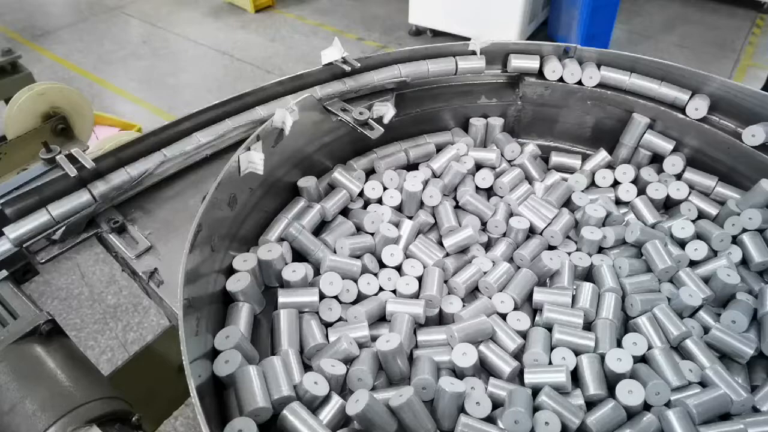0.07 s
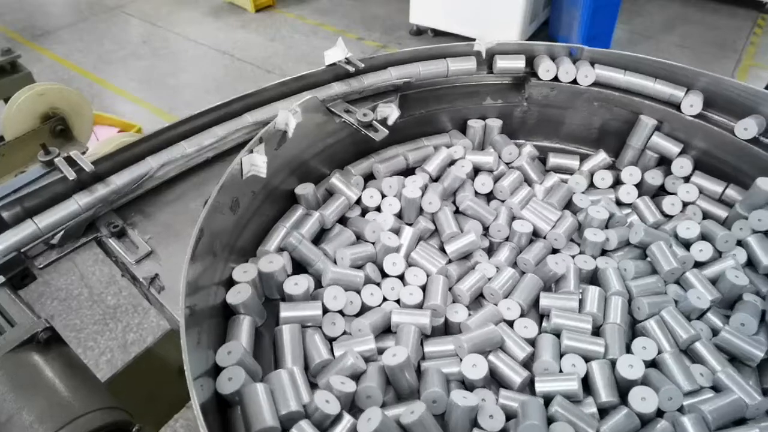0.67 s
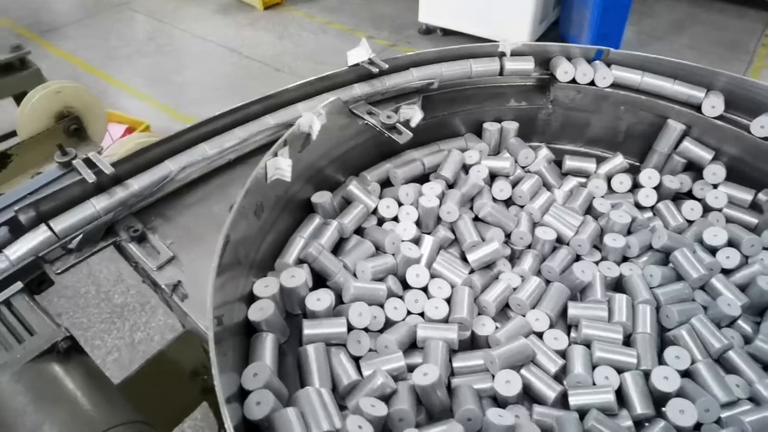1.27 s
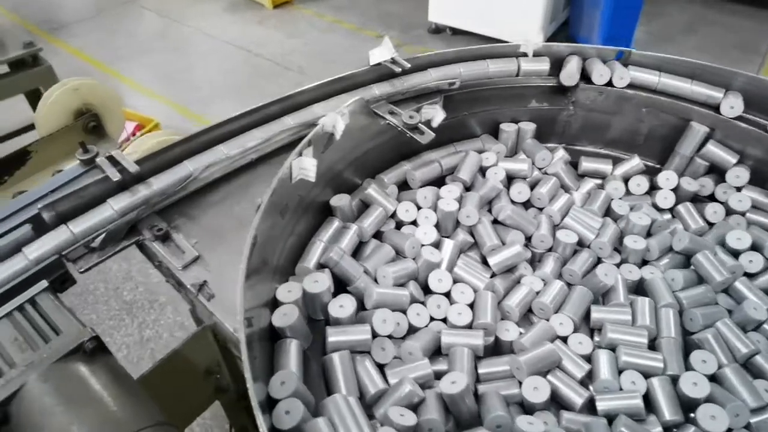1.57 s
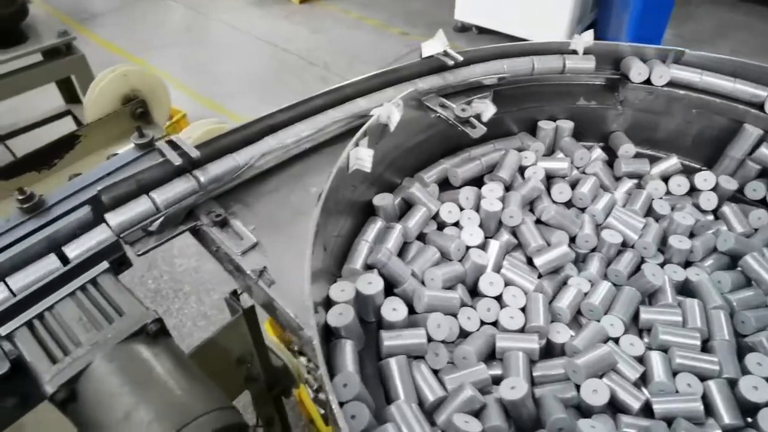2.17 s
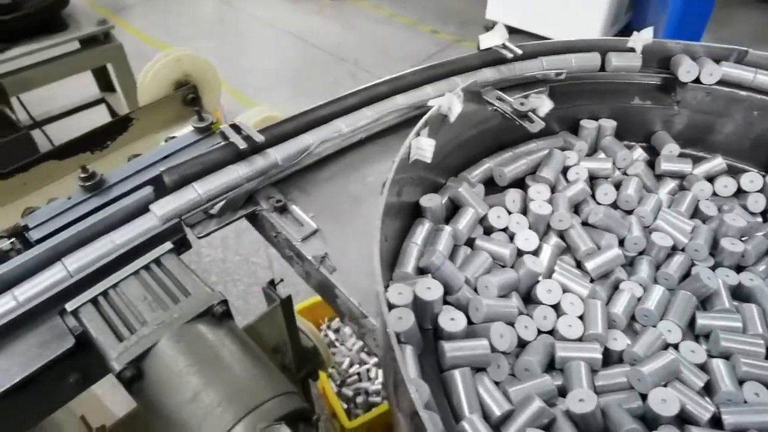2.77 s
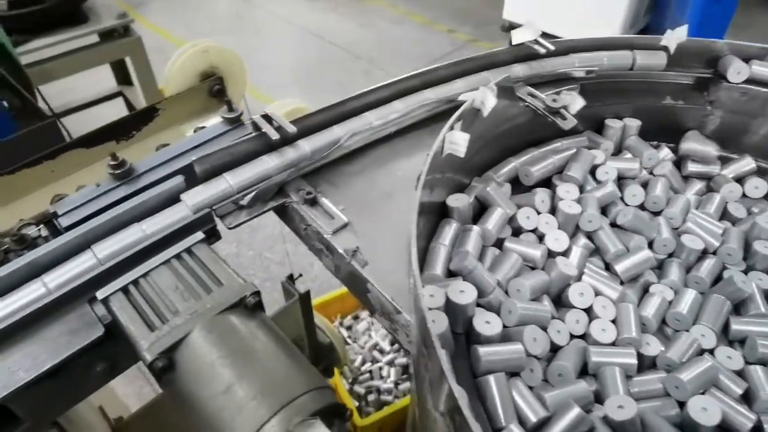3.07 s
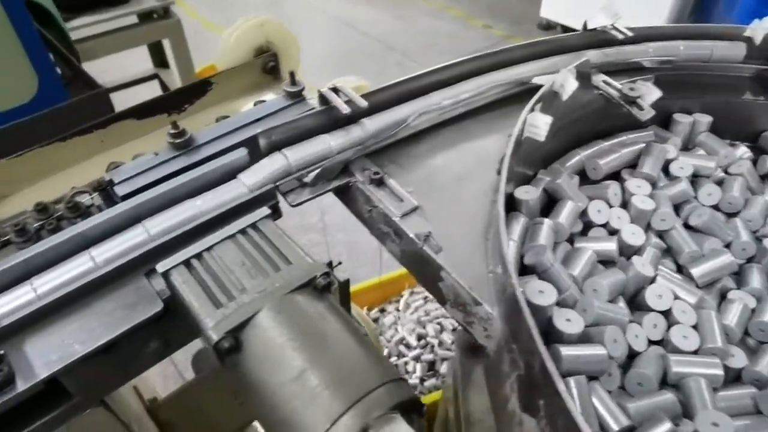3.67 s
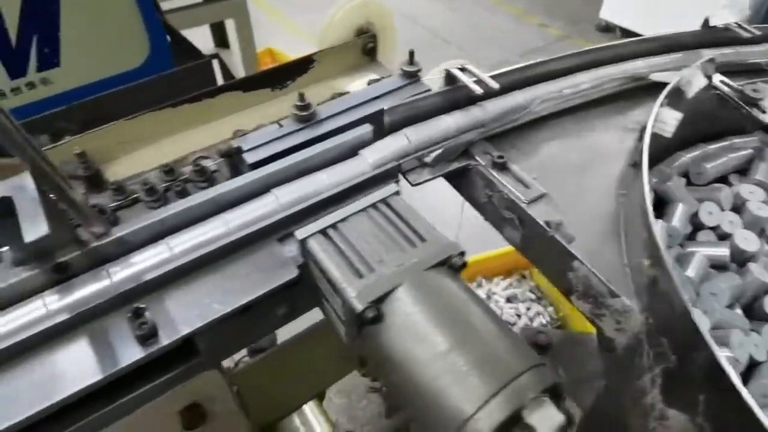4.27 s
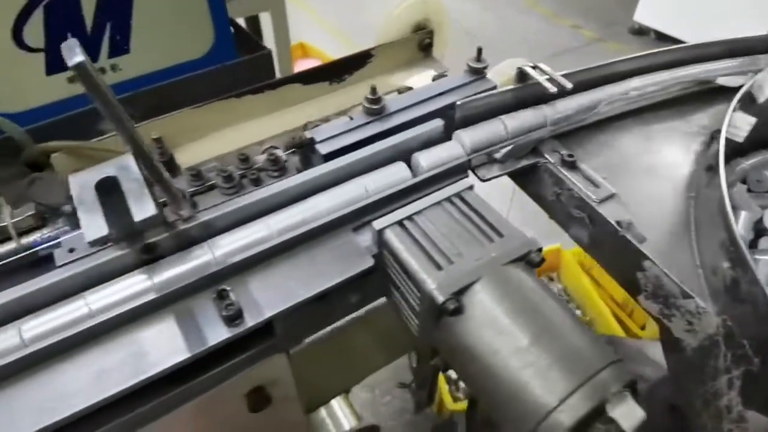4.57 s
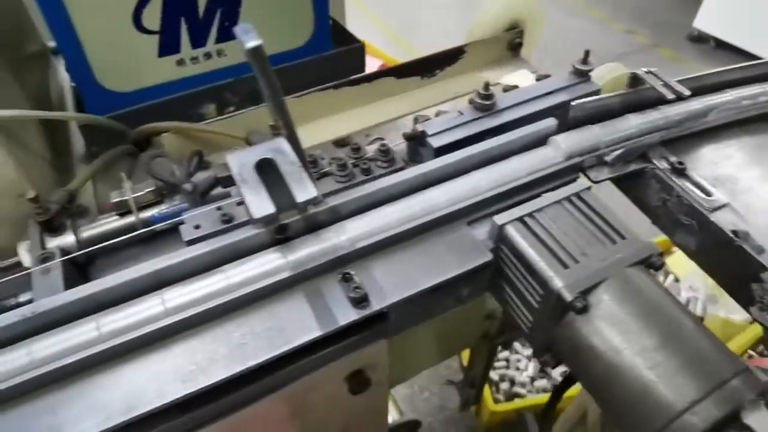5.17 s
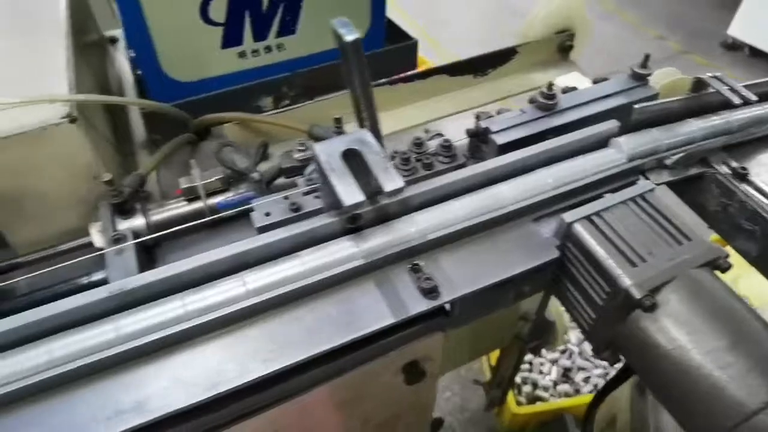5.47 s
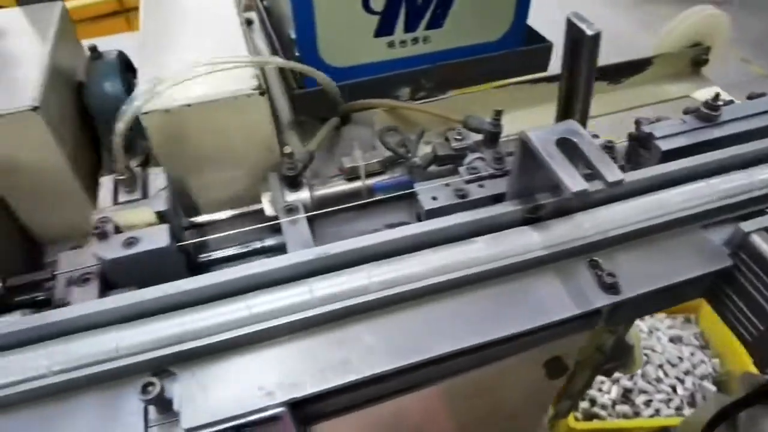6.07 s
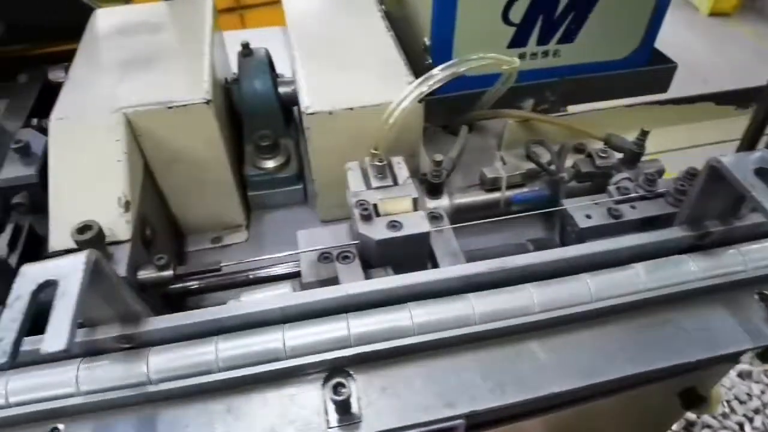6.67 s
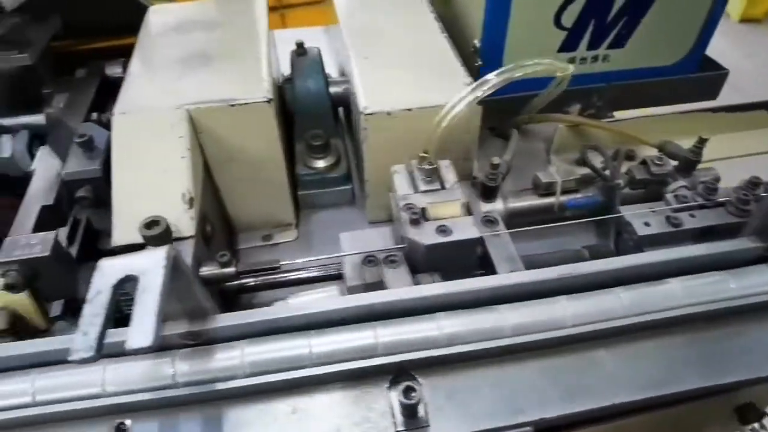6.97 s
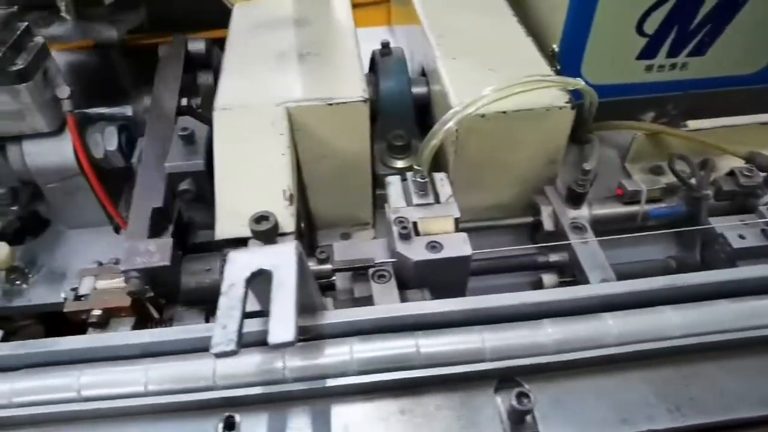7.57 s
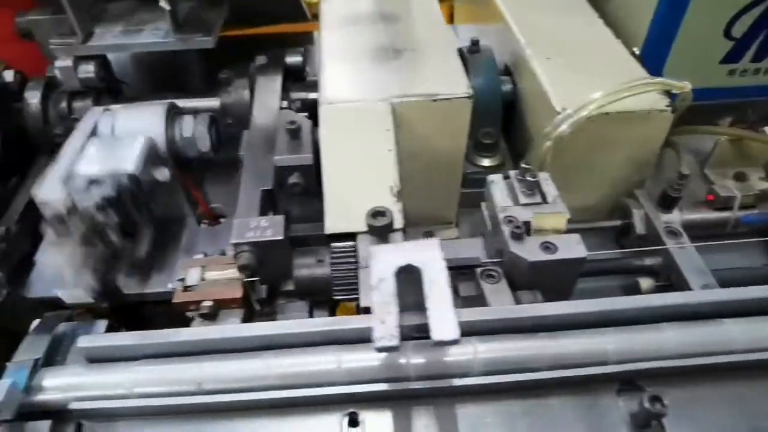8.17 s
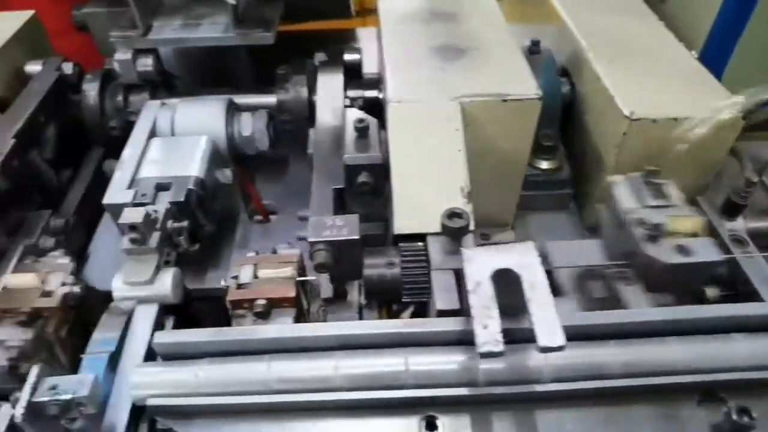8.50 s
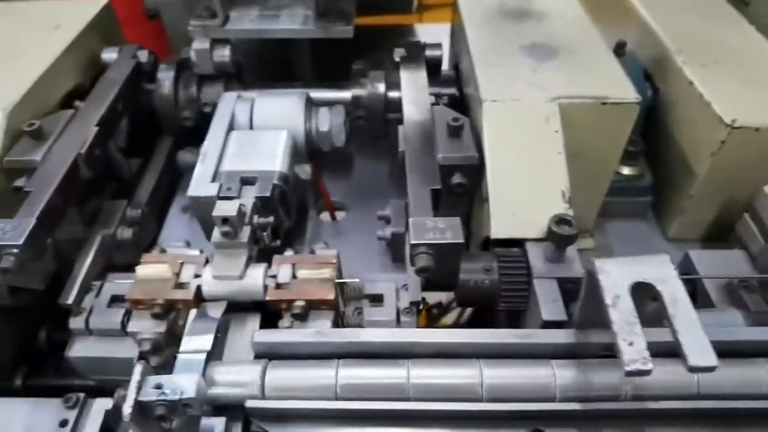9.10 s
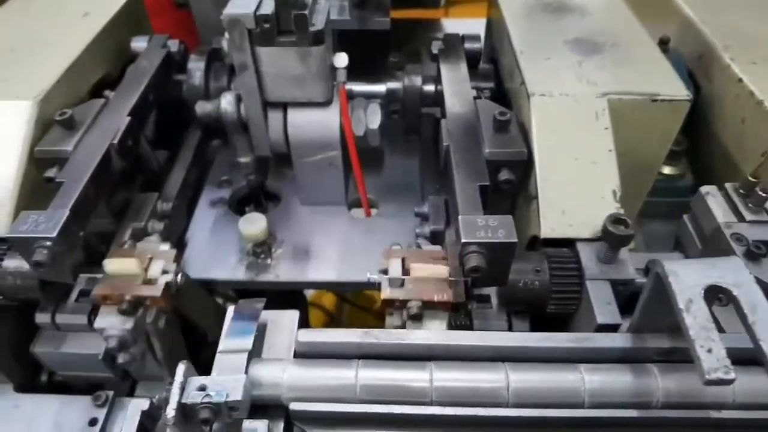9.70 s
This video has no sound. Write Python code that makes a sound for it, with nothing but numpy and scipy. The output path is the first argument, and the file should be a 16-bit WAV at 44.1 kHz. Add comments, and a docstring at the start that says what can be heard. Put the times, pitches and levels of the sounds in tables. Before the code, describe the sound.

In a factory hall, a vibrating bowl shakes small metal cylinders, making a continuous bright sizzle with scattered clinks over hum and rumble. An assembly machine repeats a round of sharp clacks, snaps and knocks about every two seconds. The microphone moves from the bowl along a rail, where chattering parts swell midway, then reaches the machine, where thuds grow heavier and a few tiny squeaks slip through.

```python
"""A factory hall, where a vibrating bowl feeder shakes small metal cylinders into an assembly machine.
The parts sizzle and clink in the bowl and chatter along the rail, over a bed of magnet hum and frame
rumble. About every 2.3 s the camshaft plays its round of clacks, snaps, knocks and thuds and the press
lands; now and then a dry slide squeaks. The microphone travels from the bowl along the rail to the
machine."""
import sys
import numpy as np
from scipy import signal
from scipy.fft import rfft, irfft, next_fast_len
from scipy.io import wavfile
from scipy.ndimage import uniform_filter1d, map_coordinates

SR = 44100
rng = np.random.default_rng(int(sys.argv[2]) if len(sys.argv) > 2 else 0)


def generate_wav(sig):
    """Save sig (samples, or channels by samples) to the path in sys.argv[1] as 16-bit PCM at SR."""
    pcm = np.round(np.clip(np.atleast_2d(sig).T, -1, 1) * 32767).astype(np.int16)
    wavfile.write(sys.argv[1], SR, pcm)


N = 433944
MAINS_HZ = 50

# stereo image of the hall: (frequency [Hz], left-right likeness [-1..1])
HALL_LIKENESS = [(100, 0.91), (350, 0.95), (700, 0.69), (1100, 0.39), (1500, -0.35), (2000, -0.28),
                 (2600, 0.36), (3600, -0.16), (4500, -0.053), (5700, -0.025), (7800, 0.47), (10000, 0.13),
                 (15000, 0.29)]
# colour of the microphone ports: (frequency [Hz], left minus right [dB])
PORT_COLOUR = [(300, 0), (800, 1.5), (2500, 0.3), (4400, -0.5), (5200, -2.5), (6000, -1), (7000, -1.7),
               (8400, 0.2), (9300, 2.5), (13000, 1)]
# brief dips of the whole mix: (middle [s], length [s], change [dB])
MIX_DIPS = [(1.35, 0.066, -3.5), (3.688, 0.07, -3)]

# fader rides: (time [s], level [dB])
MASTER_FADER = [(0.17, -68), (0.185, -34), (0.197, -3.5), (0.23, 2), (0.3, 7), (0.82, 7.5), (0.97, 2.5)]  # fades in, starts loud, settles
RUMBLE_FADER = [(0.3, -35.5), (1.2, -38), (3.2, -39.5), (4.2, -42), (4.7, -39.5), (5.2, -42.5),
                (6.6, -43.5), (7.4, -42), (7.9, -43.5), (9.1, -43), (9.84, -42.5)]  # cams and belts
RATTLE_FADER = [(0.45, -35), (0.85, -38.5), (1.0, -46), (1.8, -42), (2.9, -40), (3.3, -45), (4.4, -45.5),
                (4.7, -39), (5.0, -46), (5.25, -36), (5.55, -40.5), (6.1, -43.5), (7.4, -44.5),
                (8.0, -47.5), (9.2, -50.5), (9.84, -40)]  # sheet panels
HUM_FADER = [(0.3, -37), (1.2, -35.5), (2.59, -37.5), (2.62, -56), (5, -68), (9.84, -71)]  # the hum's fundamental, which drops away abruptly
BUZZ_FADER = [(0.3, -41), (1.0, -52), (2.6, -51), (3.8, -59), (5.1, -59), (5.4, -48), (8.0, -52),
              (9.84, -49.5)]  # the magnet's pull at twice the mains frequency
CHATTER_FADER = [(0.3, -34.5), (1.0, -38), (1.5, -36), (2.4, -36), (2.9, -35), (4.0, -39), (4.4, -40),
                 (4.57, -35.5), (4.65, -29.5), (4.77, -25.5), (4.86, -28), (4.96, -28.5), (5.0, -24.5),
                 (5.12, -23.5), (5.25, -28), (5.37, -27.5), (5.47, -25.5), (5.6, -29.5), (5.95, -34),
                 (7.1, -34.5), (7.4, -37.5), (7.9, -42.5), (8.8, -48), (9.4, -45), (9.55, -40.5),
                 (9.84, -37.5)]  # parts on track and rail
SIZZLE_FADER = [(0.3, -24.5), (1.2, -25.8), (1.75, -28), (2.65, -23), (3.35, -24), (3.8, -26.5), (4.0, -24),
                (4.3, -26), (4.7, -26.5), (5.1, -24.5), (5.25, -28), (6.2, -29.5), (6.85, -27.5),
                (7.1, -25), (7.35, -25.3), (7.75, -26.5), (8.2, -30), (9.2, -30), (9.84, -28)]  # parts in the bowl
HEAP_SIDE_FADER = [(2, 1.5), (4.4, 0), (6.5, -3.5)]  # the heap's side signal, which sets its width

# tone colours: (frequency [Hz], level [dB])
FRAME_EQ = [(25, -42), (70, -14), (105, -1), (160, 1.5), (220, -0.5), (320, -4.5), (430, -11.5),
            (800, -23.5), (2000, -65)]  # low rumble of the frame
PANEL_EQ = [(200, -20), (380, -3), (450, -4.5), (540, 1), (680, -1.5), (810, 0.5), (950, -3.5), (1400, -9),
            (3000, -23.5)]  # boxy sheet panels
CLICK_EQ = [(2500, -24), (5000, -2.5), (6700, 0), (8500, -0.5), (10500, -8), (16000, -32)]  # sharp edge of a steel hit
CLANK_EQ = [(400, -13), (900, -0.5), (1600, 1), (2000, 1.5), (2450, 3), (3500, 3), (5500, -5), (12000, -26)]  # body of a steel hit
SNAP_EQ = [(1800, -26), (2300, -1), (3400, 1), (4700, 7), (5700, 8), (8500, -7), (11000, -7), (13000, -3),
           (16000, -3)]  # bright small steel
HOUSING_EQ = [(100, -23), (300, -7.5), (480, -3), (620, 1.5), (740, -1), (860, -7), (1350, -9.5),
              (2100, -7), (4000, -26)]  # hollow housing
BED_EQ = [(50, -35), (110, -2.5), (200, 3.5), (420, -5.5), (900, -35)]  # boomy machine bed
TRACK_EQ = [(500, -38), (900, -9.5), (1400, -1.5), (1900, -0.5), (2250, 4.5), (2650, 0), (3050, -1.5),
            (3800, -5), (5500, -2.5), (9000, -28), (16000, -51)]  # the bowl's track
RAIL_EQ = [(500, -26), (900, -12.5), (1080, -3), (1230, -1.5), (1400, -0.3), (1800, 2), (2100, -1),
           (2400, 2), (2900, -0.8), (3300, -3), (3800, -6), (5500, -4.5), (9000, -15.5), (16000, -48)]  # the deeper straight rail
WALL_EQ = [(2000, -27.5), (3500, -10.5), (5000, -6), (6000, 2.5), (6800, 0.5), (8000, -6), (10000, -31),
           (16000, -30)]  # hiss of parts climbing the bowl wall
FIZZ_EQ = [(7000, -19), (9800, -1.5), (11500, -5), (16000, -15)]  # airy top of the surges
HEAP_EQ = [(4000, -35.5), (6000, -15), (7000, -5.5), (7700, -2), (8500, 0), (9100, -6.5), (10000, -13),
           (11500, -23), (13000, -26), (14000, -24), (16000, -28)]  # sizzling heap

# resonances: (frequency [Hz], width [Hz], boost [dB])
HOUSING_RINGS = [(525, 35, 4), (980, 40, 4), (1370, 90, 8)]
RAIL_RINGS = [(1400, 30, 5), (1520, 30, 4), (1720, 17, 4.5), (1877, 20, 7)]

# overtones of the drive: (multiple of the mains, level at the bowl [dB], level at the machine [dB])
HUM_OVERTONES = [(3, -50.5, -59), (4, -58, -59), (5, -50, -71), (6, -50, -70)]
# sung notes: (time [s], length [s], pitch [Hz], level [dB])
FRAME_DRONES = [(1.4, 0.6, 295, -46), (2.47, 0.13, 512, -45), (3.7, 0.56, 208.2, -40.5),
                (8.3, 0.18, 175, -39.5), (9.55, .22, 135, -38.5)]  # cam strokes set the frame droning
SLIDE_SQUEAKS = [(0.764, 0.08, 6700, -30), (5.172, 0.03, 6530, -28), (6.507, 0.048, 8930, -27),
                 (7.499, 0.04, 6600, -27.5), (7.6225, 0.017, 6620, -20), (7.65, 0.07, 6635, -39.5),
                 (7.728, 0.027, 6640, -27), (8.844, 0.05, 8995, -26.5)]  # dry slides rub

# camshaft turns: (start [s])
TURN_STARTS = [-1.189, 1.144, 3.5, 5.5, 8.118]
# cams taking up load swell the rumble: (middle within the turn [s], length [s], rise [dB])
CAM_LOADS = [(0.08, 0.25, 4), (0.31, 0.099, 3.5), (0.49, 0.16, 3.5), (0.66, 0.088, 2.5), (0.9, 0.1, 1.5),
             (1.08, 0.12, 4.5), (1.32, 0.14, 4.5), (1.58, 0.1, 2), (1.8, 0.28, 3)]
# slides and grippers hitting their stops:
# (time in the turn [s], click [dB], clank [dB], ring pitch [Hz], ring boost [dB], clank t60 [s])
STOP_HITS = [(0.002, -14.5, -28.5, 1650, 11, 0.1), (0.176, -13, -35, 2290, 10, 0.08),
             (0.31, -22, -33, 2440, 6, 0.066), (0.448, -25, -29.5, 2280, 11, 0.08),
             (0.786, -17, -34, 2290, 5, 0.07), (1.046, -25, -30, 2560, 8, 0.063),
             (1.167, -17, -34.5, 1420, 10, 0.073), (1.317, -12, -24, 1640, 12, 0.12),
             (1.352, -19, -33, 2470, 1, 0.08), (1.475, -11, -40, 2290, 5, 0.06),
             (1.518, -13.5, -24, 2440, 13, 0.072), (1.719, -13.5, -25, 1720, 4, 0.11),
             (1.84, -19, -23.5, 1360, 5, 0.1)]
# small steel parts snapping: (time in the turn [s], level [dB], t60 [s])
SNAP_HITS = [(0.176, -11.5, 0.066), (1.011, -15, 0.027), (1.021, -16, 0.025)]
# knocks on the housing: (time in the turn [s], level [dB], ring pitch [Hz], t60 [s])
HOUSING_HITS = [(0.455, -31.5, 463, 0.18), (1.167, -29, 416, 0.18), (1.349, -28.5, 850, 0.16),
                (1.52, -29.5, 350, 0.15), (1.719, -30, 760, 0.14), (1.833, -24, 770, 0.19)]
# heavy strokes shaking the bed: (time in the turn [s], level [dB], boom pitch [Hz])
BED_HITS = [(0.007, -20.5, 420), (0.086, -23, 206), (0.88, -26, 157), (0.965, -28.5, 148),
            (1.171, -28, 332), (1.345, -24, 291), (1.502, -26, 134), (1.725, -27, 210)]
# balance at the moving microphone: (time [s], stops [dB], snaps [dB], housing [dB], bed [dB])
HIT_FADERS = [(0.6, -1.5, -10, -9, -14), (1.15, -5, -10, -1, -18), (1.6, 0.5, -9, -2, -17),
              (1.9, -6, -5, 2, -16), (2.4, -7, -5, -4, -16), (2.87, 0, -4, -1, -18),
              (3.0, -2.5, -6, -1, -16), (3.5, -4.5, -5, -10, -18), (3.9, 1, -8, -6, -17),
              (4.6, -4, 0, 2, -14), (5.25, 0, -4, 3, -13), (5.9, -2, -6, -2, -14), (6.8, -3, 0, 0, -8),
              (7.15, -3.5, -2, 0.5, -4), (7.6, -1, -1, -0.5, -10), (8.1, 1.5, -0.5, 5, 2),
              (8.6, 0.5, 0, 3, 1), (9.6, 2.5, 1, 1, 2)]
# the press landing: (time [s], level [dB], lower ring [Hz], upper ring [Hz])
PRESS_HITS = [(1.134, -23, 780, 980), (3.47, -32.5, 480, 760), (5.789, -25.5, 710, 1220),
              (8.114, -20.5, 633, 1290)]

# rail modes woken by sliding parts: (frequency [Hz])
RASP_MODES = [2260, 2387, 2570, 2805]
# featured clinks of toppling parts: (time [s], level [dB], pitch [Hz])
LOUD_CLINKS = [(0.2844, -29, 7600), (0.4465, -22, 7300), (0.6296, -25, 7800), (0.7244, -22, 7000),
               (1.245, -24, 8000), (2.1556, -20, 6100), (2.4604, -20, 8000), (6.7921, -16, 6100),
               (7.0979, -17, 7700), (7.251, -22, 7400)]
# modes of one cylinder: (ratio to the lowest)
CYLINDER_RATIOS = [1, 1.12, 1.27]
# the heap shifts and the sizzle surges: (middle [s], length [s], rise [dB])
HEAP_SURGES = [(0.64, 0.05, 1.5), (0.79, 0.06, 1), (1.26, 0.16, 2), (1.9, 0.09, 3.5), (2.02, 0.09, 2),
               (2.17, 0.1, 2.5), (2.31, 0.11, 3), (2.46, 0.08, 2.5), (2.71, 0.07, 3), (3.18, 0.09, 2.5),
               (4.46, 0.19, 6.5), (4.89, 0.17, 7), (5.39, 0.22, 5.5), (5.67, 0.2, 8.5), (5.95, 0.15, 9),
               (6.06, 0.12, 3), (6.52, 0.12, 3.5), (7.23, 0.17, 0.5), (7.46, 0.15, 4), (7.905, 0.13, 6),
               (8.5, 0.12, 6.5), (8.94, 0.24, 5), (9.15, 0.14, 3.5), (9.35, 0.24, 7.5), (9.45, 0.091, 6),
               (9.79, 0.13, 4.5)]


def amp(db):
    """Decibels to gain."""
    return 10 ** (np.asarray(db) / 20)


def unit(x):
    """Scale to rms 1."""
    return x / np.sqrt(np.mean(x ** 2) + 1e-20)


def noise(n=N):
    """Two unrelated channels of white noise."""
    return rng.standard_normal((2, n))


def along(points, hz):
    """Read (frequency, value) points on a log axis."""
    freqs, values = np.transpose(points)
    return np.interp(np.log(hz + 1), np.log(freqs + 1), values)


def curves(rows):
    """Automation: one value per sample for each column after the time."""
    times, *columns = np.transpose(rows)
    return [np.interp(np.arange(N) / SR, times, column) for column in columns]


def swells(rows):
    """A level in dB with a smooth bump for each (middle, length, rise)."""
    t = np.arange(0, N / SR, .005)
    level_db = sum(db * np.cos(np.pi * np.clip((t - s) / length, -.5, .5)) ** 2 for s, length, db in rows)
    return np.interp(np.arange(N) / SR, t, level_db)


def wobble(rate):
    """A smooth random curve, rate knots a second."""
    knots = rng.standard_normal(int(N * rate / SR) + 4)
    return map_coordinates(knots, [np.arange(N) * rate / SR])


def nearness():
    """Perspective: near 0 beside the bowl, near 1 beside the machine."""
    return curves([(4.0, 0.13), (4.8, 0.87)])[0]


def every_turn(rows):
    """Loop one camshaft turn's cues over all turns."""
    return [(start + s, *rest) for start in TURN_STARTS for s, *rest in rows if 0 < start + s < N / SR]


def add(track, s, sound):
    """Mix a sound in at time s."""
    part = track[:, max(round(s * SR), 0):][:, :sound.shape[1]]
    part += sound[:, :part.shape[1]]


def filtered(x, response):
    """Shape x with a frequency response."""
    n = x.shape[-1]
    padded = next_fast_len(n + SR // 8)
    return irfft(rfft(x, padded) * response(np.fft.rfftfreq(padded, 1 / SR)), padded)[..., :n]


def resonate(x, rings):
    """Boost a resonant peak for each (frequency [Hz], width [Hz], boost [dB])."""
    def response(hz):
        peaks = [1 + (amp(db) - 1) / (1 + 2j * (hz - centre) / width) for centre, width, db in rings]
        return np.prod(peaks, axis=0)
    return filtered(x, response)


def coloured(pair, eq):
    """Give two unrelated signals this EQ and the hall's stereo image, at rms 1."""
    def response(hz):
        angle = np.arccos(np.clip(along(HALL_LIKENESS, hz), -1, 1)) / 2
        return amp(along(eq, hz)) * np.array([np.cos(angle), np.sin(angle)])
    mid, side = filtered(pair, response)
    return unit(np.array([mid + side, mid - side]))


def with_width(pair, side_db):
    """Widen or narrow the image by riding its side signal."""
    mid = (pair[0] + pair[1]) / 2
    side = (pair[0] - pair[1]) / 2 * amp(side_db)
    return unit(np.array([mid + side, mid - side]))


def jostled(pair, depth_db, window, frames):
    """Parts keep turning and touching elsewhere, so different pitches ring from moment to moment."""
    spectra = signal.stft(pair, nperseg=window)[2]
    flicker = uniform_filter1d(rng.standard_normal(spectra.shape[1:]), 2, axis=0)
    flicker = uniform_filter1d(flicker, frames, axis=1)
    gain = amp(depth_db * np.clip(unit(flicker), -2, 2))
    return unit(signal.istft(spectra * gain, nperseg=window)[1][:, :N])


def collisions(rate, spread_db, t60, throb, blur_db, bodies=8):
    """Tiny contacts ring steel bodies over a blur of noise, denser at each half stroke of the drive."""
    density = 1 + throb * np.cos(4 * np.pi * MAINS_HZ * np.arange(N) / SR)
    sizes = amp(spread_db * np.clip(rng.standard_normal(N), -2, 2)) * rng.choice([-1, 1], N)
    hits = sizes * (rng.random(N) < rate * density / SR)
    struck = rng.integers(bodies, size=N)
    t = np.arange(SR // 20) / SR
    ticks = np.zeros((2, N))
    for body in range(bodies):
        ring = noise(len(t)) * amp(-60 * t / t60)
        ticks += signal.oaconvolve((hits * (struck == body))[None], ring, axes=1)[:, :N]
    return unit(ticks) + amp(blur_db) * noise()


def blow(eq, t60, attack, hall_db, rings=()):
    """A struck part with crowded modes and leading rings: a quick decay, then the hall's tail."""
    t = np.arange(SR // 2) / SR
    decay = amp(-60 * t / t60) + amp(hall_db - 60 * t / 0.47)
    modes = resonate(noise(len(t)), rings)
    return coloured(modes, eq) * decay * (1 - np.exp(-t / attack))


def frame_rumble():
    """Cams and belts rumble through the frame, harder under load."""
    rumble = collisions(rate=300, spread_db=1, t60=0.059, throb=0.3, blur_db=-0.5)
    level_db = curves(RUMBLE_FADER)[0] + swells(every_turn(CAM_LOADS)) - 2 + 1.4 * wobble(20)
    return amp(level_db) * coloured(rumble, FRAME_EQ)


def panel_rattle():
    """The running machine rattles its sheet panels."""
    rattle = collisions(rate=120, spread_db=3, t60=0.059, throb=0.4, blur_db=-2)
    rattle = jostled(rattle, depth_db=3.2, window=2048, frames=3)
    return amp(curves(RATTLE_FADER)[0] + 0.83 * wobble(18)) * coloured(rattle, PANEL_EQ)


def magnet_hum():
    """The drive's electromagnet hums at mains pitch, richer in overtones close to the bowl."""
    phase = 2 * np.pi * MAINS_HZ * np.arange(N) / SR
    hum = amp(curves(HUM_FADER)[0] + 0.79 * wobble(12.6)) * np.sin(phase)
    hum += amp(curves(BUZZ_FADER)[0] + 1.6 * wobble(11)) * np.cos(2 * phase)
    for multiple, bowl_db, machine_db in HUM_OVERTONES:
        level_db = bowl_db + nearness() * (machine_db - bowl_db) + 1.9 * wobble(5.4)
        hum += amp(level_db) * np.sin(multiple * phase + 2 * np.pi * rng.random())
    return np.sqrt(2) * hum


def singing_steel(notes, waver_hz, waver_rate, flutter_db=1):
    """Rubbed steel sings for a while on one unsteady mode."""
    out = np.zeros((2, N))
    for s, length, hz, db in notes:
        n = int(length * SR)
        envelope = signal.windows.tukey(n, .18) * amp(db + flutter_db * wobble(waver_rate / 2)[:n])
        phase = 2 * np.pi * np.cumsum(hz + waver_hz * wobble(waver_rate)[:n]) / SR
        add(out, s, np.sqrt(2) * envelope * np.sin(phase)[None])
    return out


def cam_hits():
    """In every turn the stops click and clank, small parts snap, the housing knocks and the bed booms."""
    stops, snaps, housing, bed = np.zeros((4, 2, N))
    for s, click_db, clank_db, hz, ring_db, t60 in every_turn(STOP_HITS):
        click = blow(CLICK_EQ, t60=0.059, attack=0.0009, hall_db=-30)
        clank = blow(CLANK_EQ, t60, attack=0.0017, hall_db=-26, rings=[(hz, 380, ring_db)])
        add(stops, s, amp(click_db - 6.5) * click + amp(clank_db + 2) * clank)
    for s, db, t60 in every_turn(SNAP_HITS):
        snap = blow(SNAP_EQ, t60, attack=0.001, hall_db=-22, rings=[(12400, 900, 8.2)])
        add(snaps, s, amp(db - 5) * snap)
    for s, db, hz, t60 in every_turn(HOUSING_HITS):
        knock = blow(HOUSING_EQ, t60, attack=0.0035, hall_db=-28, rings=[(hz, 80, 7.5), *HOUSING_RINGS])
        add(housing, s, amp(db - 3.5) * knock)
    for s, db, hz in every_turn(BED_HITS):
        boom = blow(BED_EQ, t60=0.31, attack=0.0032, hall_db=-24, rings=[(hz, 25, 14)])
        add(bed, s, amp(db - 7.5) * boom)
    stops_db, snaps_db, housing_db, bed_db = curves(HIT_FADERS)
    return amp(stops_db) * stops + amp(snaps_db) * snaps + amp(housing_db) * housing + amp(bed_db) * bed


def press(seat_delay_s=0.022, seat_loss_db=7):
    """A heavy double hit rings the housing: the tool lands, then seats more softly."""
    out = np.zeros((2, N))
    for s, db, low_hz, high_hz in PRESS_HITS:
        rings = [(low_hz, 130, 9), (high_hz, 100, 9), *HOUSING_RINGS]
        landing = blow(HOUSING_EQ, t60=0.19, attack=0.0048, hall_db=-27, rings=rings)
        seating = blow(HOUSING_EQ, t60=0.21, attack=0.0035, hall_db=-25, rings=rings)
        add(out, s, amp(db) * landing)
        add(out, s + seat_delay_s, amp(db - seat_loss_db) * seating)
    return out


def rasp(width_hz=240, swing_db=5):
    """Sliding parts wake neighbouring rail modes by turns, so the rasp keeps shifting in pitch."""
    friction = noise()
    bands = np.zeros((2, N))
    for centre in RASP_MODES:
        band = filtered(friction, lambda hz: 1 / (1 + 2j * (hz - centre) / width_hz) ** 2)
        bands += amp(swing_db * wobble(22)) * band
    return coloured(bands, RAIL_EQ)


def rail_chatter(rasp_db=-13.5):
    """Parts chatter in step with the drive, crossfading from the bowl's track to the deeper rail."""
    contacts = collisions(rate=700, spread_db=1.5, t60=0.033, throb=0.6, blur_db=-0.5)
    contacts = jostled(contacts, depth_db=2.8, window=1024, frames=4)
    track = coloured(contacts, TRACK_EQ)
    rail = coloured(resonate(contacts, RAIL_RINGS), RAIL_EQ)
    near = nearness()
    level_db = curves(CHATTER_FADER)[0] + 1.18 + 0.91 * wobble(25)
    return amp(level_db) * ((1 - near) * track + near * rail + amp(rasp_db) * rasp())


def clink(hz, ring_t60=0.051, tick_t60=0.011, attack=0.00033):
    """One steel cylinder taps another: a tick and a few short, high modes."""
    t = np.arange(SR // 12) / SR
    modes = hz * np.array(CYLINDER_RATIOS)[:, None]
    phase = 2 * np.pi * rng.random((2, len(modes), 1))
    gains = amp(rng.normal(0, 2.6, (len(modes), 1))) * (hz / modes) ** 2
    ring = (gains * np.sin(2 * np.pi * modes * t + phase)).sum(axis=1)
    tick = coloured(noise(len(t)), CLICK_EQ) * amp(-60 * t / tick_t60)
    return (ring * amp(-60 * t / ring_t60) + 0.56 * tick) * (1 - np.exp(-t / attack))


def tumbling_parts(count=170, range_db=13, centre_hz=7060, octaves=0.44, bounce_s=0.02):
    """Parts topple and bounce once: a few loud clinks, and many small ones riding the sizzle's fader."""
    out = np.zeros((2, N))
    position, softness, pitch = rng.random((count, 3)).T
    times = position * N / SR
    levels_db = np.interp(times, *np.transpose(SIZZLE_FADER)) - 0.5 - range_db * softness
    pitches_hz = centre_hz * 2 ** (octaves * (pitch - .5))
    for s, db, hz in [*LOUD_CLINKS, *zip(times, levels_db, pitches_hz)]:
        add(out, s, amp(db) * clink(hz))
        add(out, s + bounce_s * (.5 + rng.random()), amp(db - 6.5) * clink(hz))
    return out


def bowl_sizzle():
    """The shaken heap sizzles in surges, near ticks over a blur of far ones."""
    sizzle_db = curves(SIZZLE_FADER)[0] + 0.5 * wobble(15)
    surge_db = swells(HEAP_SURGES)
    heap = collisions(rate=600, spread_db=0.5, t60=0.013, throb=0.1, blur_db=2.5)
    heap = jostled(heap, depth_db=3.8, window=256, frames=7)
    heap = jostled(heap, depth_db=2.6, window=2048, frames=3)
    heap = coloured(resonate(heap, [(13550, 270, 5.4)]), HEAP_EQ)
    heap = with_width(heap, curves(HEAP_SIDE_FADER)[0])  # narrows with distance
    heap *= amp(sizzle_db + surge_db - 1.03 + 0.63 * wobble(55))
    # parts climbing the wall add a lower hiss with a thin ring
    wall = collisions(rate=350, spread_db=1.5, t60=0.016, throb=0.11, blur_db=1.5)
    wall = jostled(wall, depth_db=2.8, window=512, frames=5)
    wall = coloured(resonate(wall, [(6647, 50, 6.1)]), WALL_EQ)
    # the fizz grows faster than the heap, so strong surges turn brighter
    fizz = coloured(jostled(noise(), depth_db=4, window=512, frames=5), FIZZ_EQ)
    fizz_db = sizzle_db + 1.83 * surge_db - 18.5
    wall_db = sizzle_db + 0.93 * surge_db - 5.5 + 0.63 * wobble(20)
    return heap + amp(fizz_db) * fizz + amp(wall_db) * wall


def scene():
    """The mix: bright parts and machine hits over a bed of rumble and hum."""
    squeaks = singing_steel(SLIDE_SQUEAKS, waver_hz=44.8, waver_rate=300, flutter_db=-1)
    drones = singing_steel(FRAME_DRONES, waver_hz=16.4, waver_rate=70)
    parts = bowl_sizzle() + tumbling_parts() + rail_chatter()
    background = frame_rumble() + panel_rattle() + magnet_hum() + drones
    return background + squeaks + cam_hits() + press() + parts


def record(dry):
    """Master chain: a quick fade-in, two brief dips, each port's own colour and a steep high cut."""
    cutoff_hz = 15850
    gain = amp(curves(MASTER_FADER)[0] + swells(MIX_DIPS))
    left_right = np.array([[.5], [-.5]])
    return filtered(dry * gain, lambda hz: amp(along(PORT_COLOUR, hz) * left_right) * (hz < cutoff_hz))


dry = scene()
out = record(dry)
generate_wav(out)
```